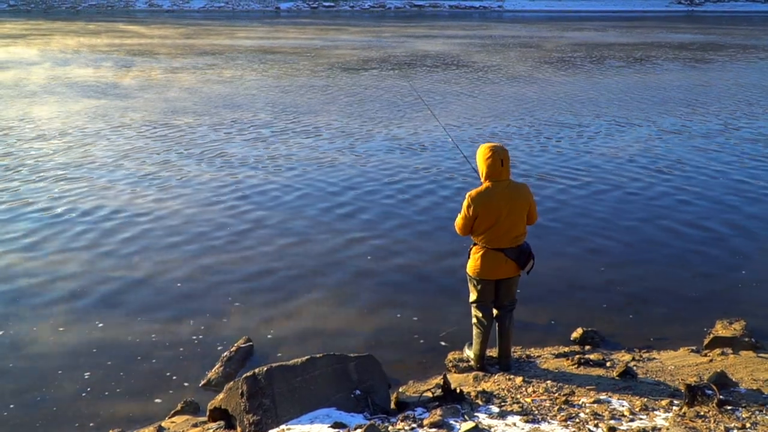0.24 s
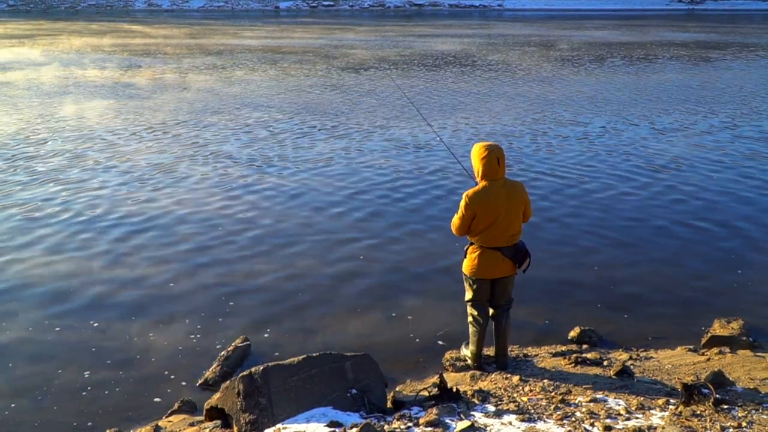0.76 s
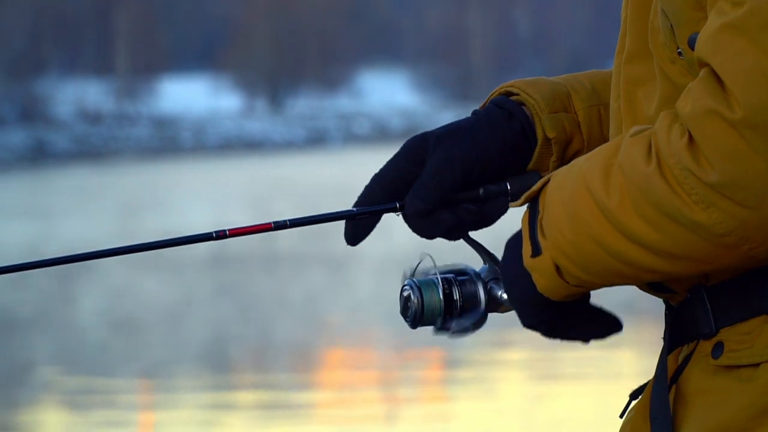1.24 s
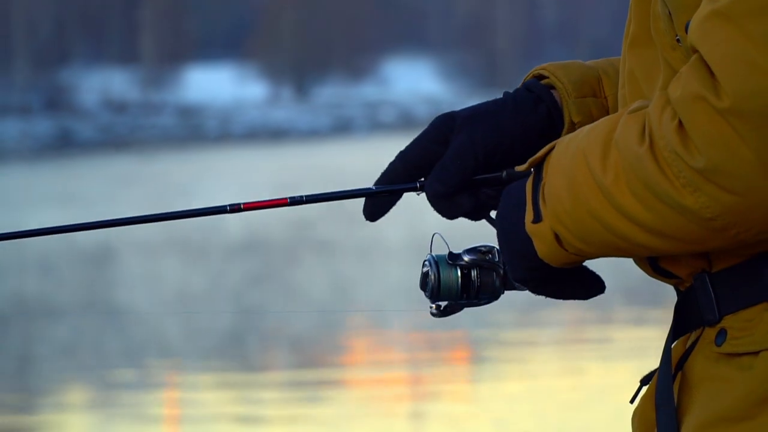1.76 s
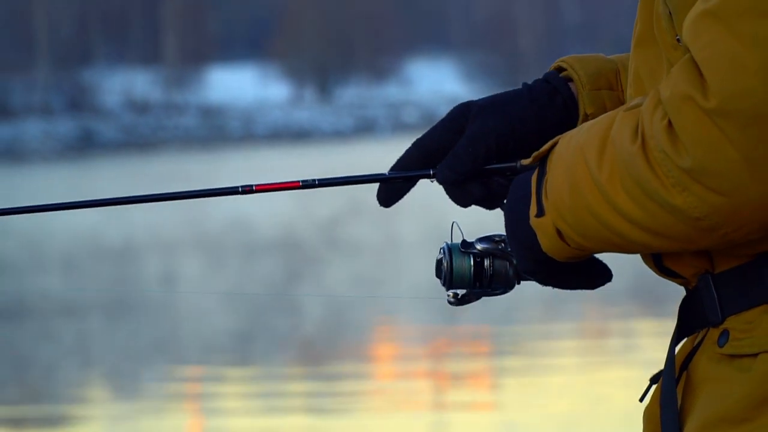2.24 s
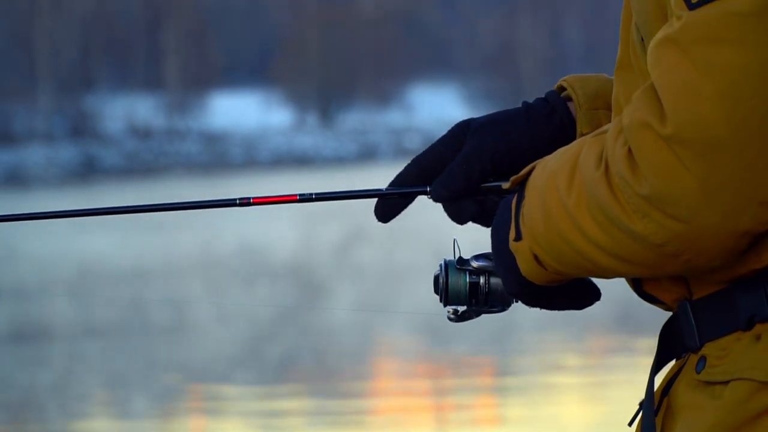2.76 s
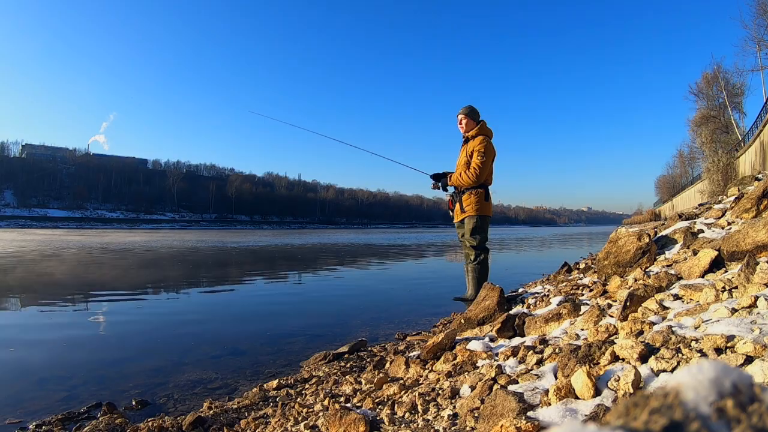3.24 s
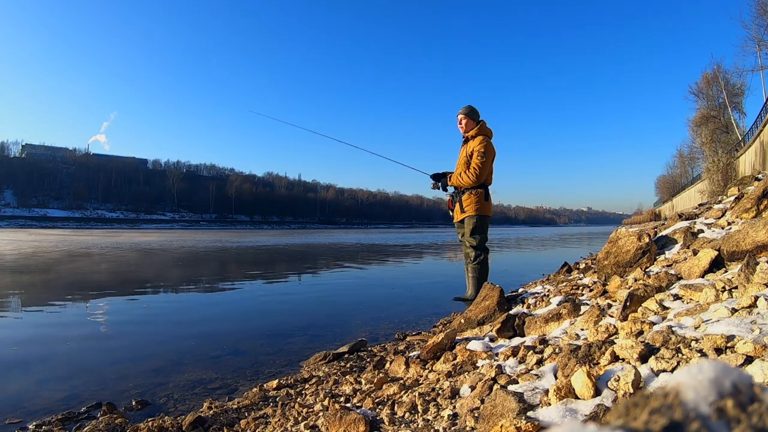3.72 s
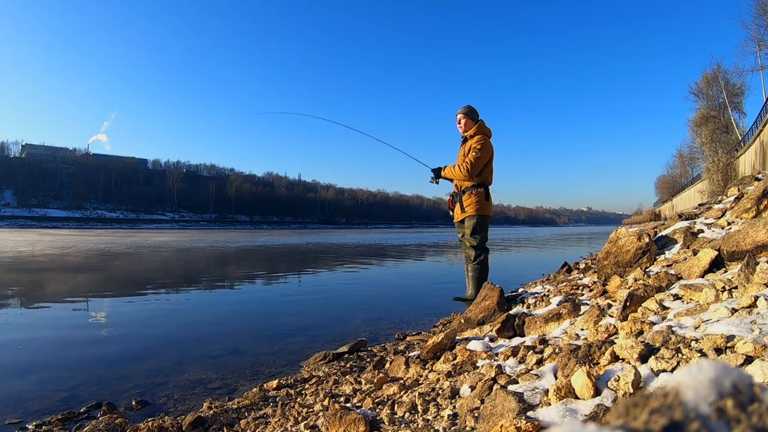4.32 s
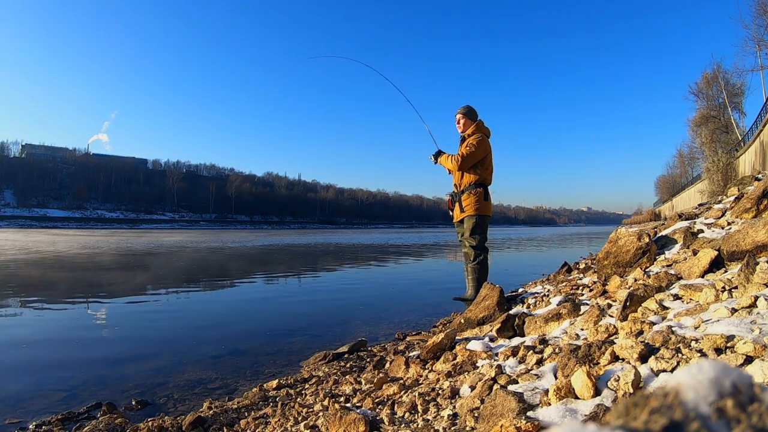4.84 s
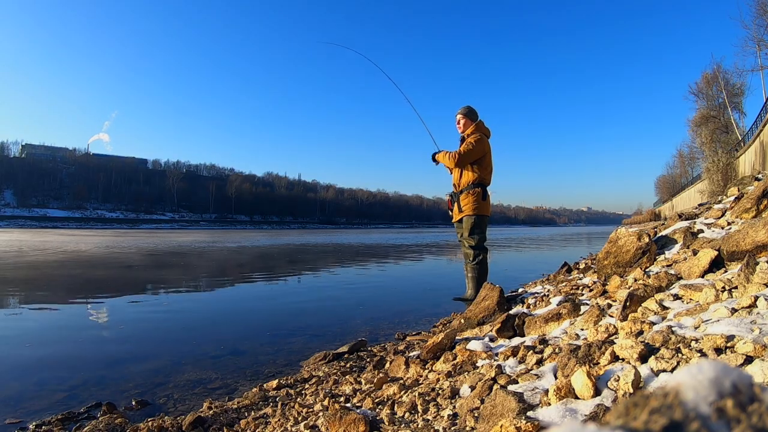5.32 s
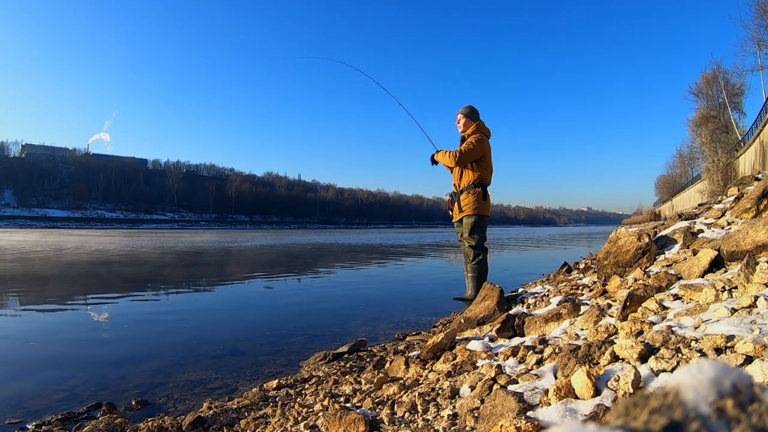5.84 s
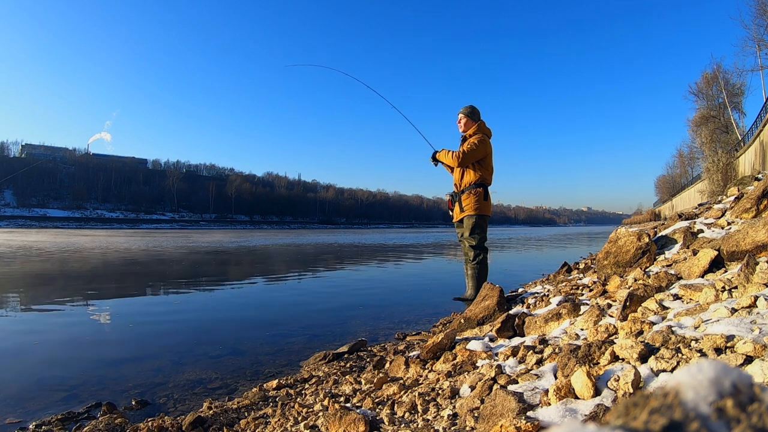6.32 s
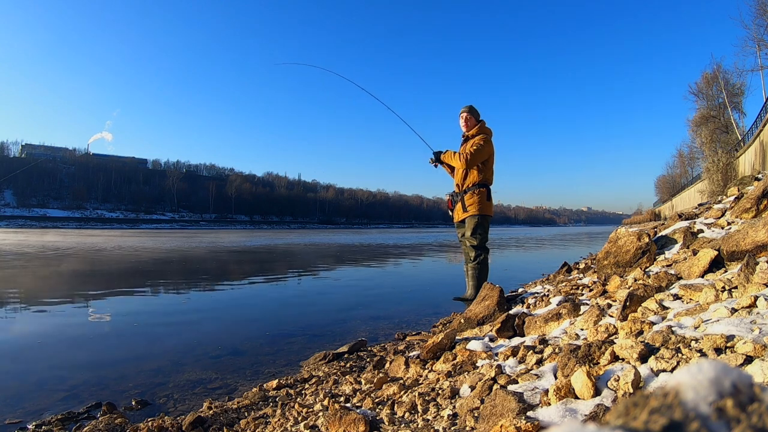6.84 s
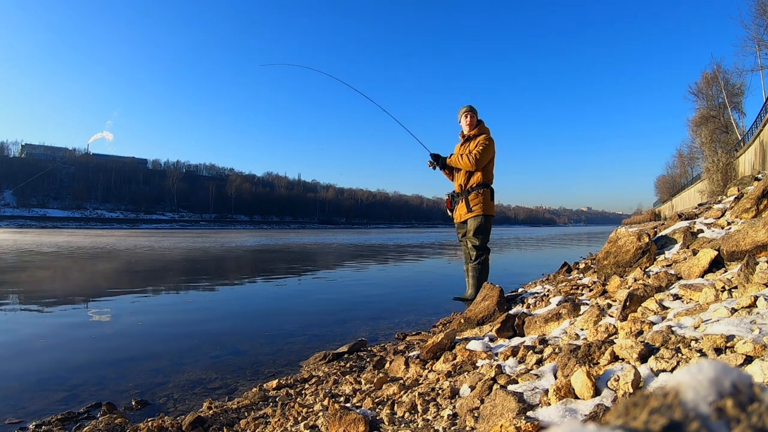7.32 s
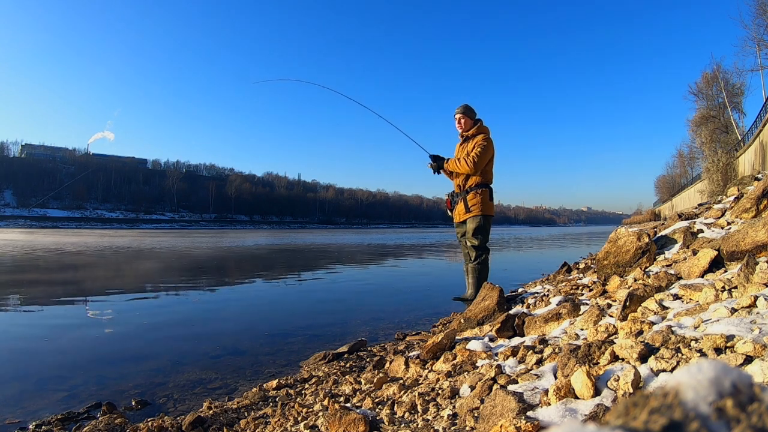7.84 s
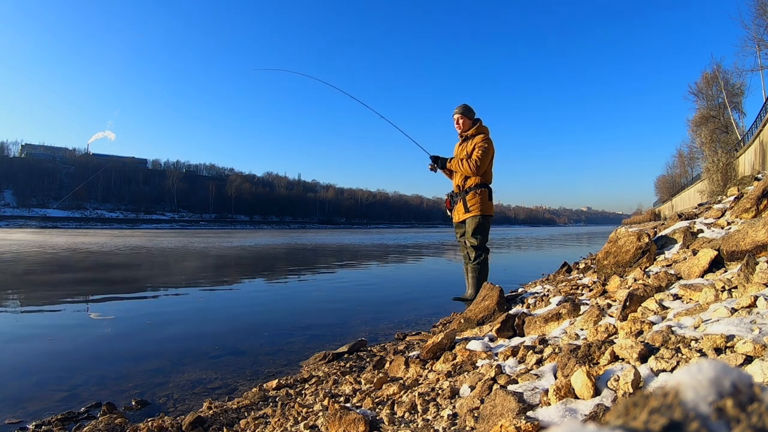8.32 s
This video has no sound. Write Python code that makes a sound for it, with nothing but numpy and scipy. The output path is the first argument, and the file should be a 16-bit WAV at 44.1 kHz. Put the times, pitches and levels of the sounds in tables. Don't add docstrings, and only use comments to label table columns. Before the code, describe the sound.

A continuous low rumble of distant city traffic spreads across a wide, open river bank, blended with soft tyre roar and a very faint hiss that slowly thins. From 0 to 0.6 s a weak brake scrape fades on the left, while a steady-pitched gearbox hum surges at 0.2, 1.3, 2 and 3 s, ending near 3.8 s. A heavy engine throbs in short deep pulses, with tiny bright brake chirps around 2.1 and 3.5 s. From 3.8 to 5.8 s the throbs become strongest and slightly higher, then weaken. A second deep engine gradually speeds up, swelling from 5.4 s to a peak at 6.8 s, then easing away. A low, dull brake scrape sounds at 6.7 s; faint high squeals follow to about 8 s. Small rumble swells close the 8.6 s. The stereo microphone is distant, with bass shared and treble wide.

```python
import sys
import numpy as np
from scipy import signal
from scipy.fft import rfft, irfft, next_fast_len
from scipy.io import wavfile
from scipy.ndimage import uniform_filter1d, map_coordinates

SR = 44100
rng = np.random.default_rng(int(sys.argv[2]) if len(sys.argv) > 2 else 0)


def wav_record(signal):
    frames = np.transpose(np.atleast_2d(signal))
    bounded = np.clip(frames, -1, 1)
    quanta = np.round(bounded * 32767).astype(np.int16)
    wavfile.write(sys.argv[1], SR, quanta)


def volts_from_db(level):
    exponent = np.asarray(level, float) / 20
    return 10 ** exponent


N = 378378
TIME_S = np.arange(N) / SR


def unit(x):
    return x / np.sqrt(np.mean(x ** 2) + 1e-20)


def along(points, hz):
    point_hz, value = np.transpose(points)
    return np.interp(np.log(hz + 1), np.log(point_hz + 1), value)


def wobble(knots_per_s):
    knots = rng.standard_normal(int(N * knots_per_s / SR) + 4)
    return map_coordinates(knots, [np.arange(N) * knots_per_s / SR])


def filtered(x, response):
    size = next_fast_len(N + 8192)
    return irfft(rfft(x, size) * response(np.fft.rfftfreq(size, 1 / SR)), size)[..., :N]


def plateau(start_s, length_s, edge_s):
    outside_s = np.maximum(start_s - TIME_S, TIME_S - start_s - length_s)
    return np.clip(1 - outside_s / edge_s, 0, 1)


def bursts(rows, rise_db_per_s, sag_db_per_s, fall_db_per_s):
    levels_db = []
    for start_s, hold_s, level_db in rows:
        since_s = TIME_S - start_s
        rise_db = rise_db_per_s * np.clip(-since_s, 0, None)
        sag_db = sag_db_per_s * np.clip(since_s, 0, hold_s)
        fall_db = fall_db_per_s * np.clip(since_s - hold_s, 0, None)
        levels_db.append(level_db - rise_db - sag_db - fall_db)
    return volts_from_db(np.max(levels_db, axis=0))


def tone(hz, wander_rad):
    return np.sqrt(2) * np.sin(2 * np.pi * np.cumsum(hz) / SR + wander_rad * wobble(6))


def narrow(hz, width_hz, shape):
    f = np.fft.rfftfreq(shape[1], 1 / SR)
    resonance = 1 + (2 * (f - hz) / width_hz) ** 2
    return unit(irfft(rfft(rng.standard_normal(shape)) / resonance, shape[1]))


# freq_hz, likeness [0-1]
ALIKE = [(30, 0.9), (70, 0.84), (110, 0.97), (350, 1), (480, 1), (620, 0.5), (700, 0), (850, 0.21),
         (2300, 0.03), (3200, 0)]


def rush(spectrum, patchy_db):
    z = signal.stft(rng.standard_normal((2, N + 512)), nperseg=512)[2]
    patches = uniform_filter1d(rng.standard_normal(z.shape[1:]), size=6, axis=0)
    patches = uniform_filter1d(patches, size=20, axis=1)
    pair = signal.istft(z * volts_from_db(patchy_db * unit(patches)), nperseg=512)[1][:, :N]

    def mid_side(hz):
        turn_rad = np.arccos(np.clip(along(ALIKE, hz), 0, 1)) / 2
        return volts_from_db(along(spectrum, hz)) * [np.cos(turn_rad), np.sin(turn_rad)]

    mid, side = filtered(pair, mid_side)
    return unit(np.array([mid + side, mid - side]))


# freq_hz, density_db [per Hz]
RUMBLE = [(8, -47), (20, -16), (30, -7.5), (42, -0.5), (86, 1.5), (140, -3.5), (217, -5), (290, -7.5),
          (345, -8), (400, -11), (500, -17.5), (650, -37), (1100, -120)]
ROAR = [(210, -39), (350, -5.5), (430, -16.5), (580, -11.5), (760, -17), (950, -20.5), (1450, -24.5),
        (1700, -26.5), (2100, -30.5), (2600, -34.5), (3400, -40.5), (5000, -53), (8000, -120)]
HISS = [(1200, -42), (2600, -12.5), (3400, -0.5), (4500, -1), (6000, -4), (8000, -9), (10000, -13.5),
        (12500, -21.5), (15300, -31), (16500, -120)]
# freq_hz, density_db
EXHAUST = [(15, -120), (38, -20.5), (60, 8), (85, 10.0), (120, -18.5), (300, -120)]
# start_s, length_s, rumble_swell_db, exhaust_swell_db
PASSES = [
    (0, 0.11, -1.5, 1),
    (3.85, 0.12, 2.3, -3.5),
    (6.35, .15, 0, 12.5),
    (7.001, .1, -0.5, 1),
    (7.58, .05, 3, 6.5),
    (7.94, .03, 2.5, 0.5),
    (8.265, .03, 0, 2),
    (8.5, 0.087, 2.2, -3),
]


def road():
    body_db, exhaust_db = sum(np.outer(row[2:], plateau(row[0], row[1], edge_s=0.08)) for row in PASSES)
    swell = wobble(1.6)
    rumble = volts_from_db(-26.5 + body_db + 0.67 * swell) * rush(RUMBLE, patchy_db=0.12)
    roar = volts_from_db(-37.5 + 0.39 * body_db + 0.24 * swell) * rush(ROAR, patchy_db=0.82)
    hiss_fade_db_per_s = 0.39
    hiss = volts_from_db(-62 - hiss_fade_db_per_s * TIME_S + 0.41 * swell) * rush(HISS, patchy_db=0.5)
    exhausts = volts_from_db(-40.5 + exhaust_db) * rush(EXHAUST, patchy_db=0.5)
    return rumble + exhausts + volts_from_db([[0.7], [-0.7]]) * (roar + hiss)


def brakes(rows, width_share, rise_s):
    t = np.arange(2 ** 16) / SR
    out = np.zeros((2, N + len(t)))
    flutter_db = 1.1 * wobble(14)
    for start_s, length_s, pitch_hz, level_db, pan_db in rows:
        rise = np.clip(t / rise_s, 0, 1)
        fade_db = -60 * np.clip(t - length_s, 0, None) / (0.46 + 3.6 * length_s)
        sides_db = np.array([[pan_db], [-pan_db]]) / 2
        ring = narrow(pitch_hz, width_share * pitch_hz, shape=(2, len(t)))
        start = round(start_s * SR)
        out[:, start:start + len(t)] += rise * volts_from_db(level_db + fade_db + sides_db) * ring
    return volts_from_db(flutter_db) * out[:, :N]


# start_s, length_s, pitch_hz, level_db, left_minus_right_db
SCRAPES = [
    (0.0, 0.57, 1770, -59.5, 6.5),
    (2.4, 0.091, 1710, -57, 4.5),
    (5.1, .33, 10800, -85, -11),
    (6.7, 0.54, 1210, -45.5, -1),
    (7.29, 0.89, 10600, -78.5, -7),
]


def brake_scrapes():
    return brakes(SCRAPES, width_share=0.11, rise_s=0.12)


# start_s, hold_s, level_db
SURGES = [
    (.2, .42, -30),
    (1.05, .15, -34),
    (1.27, 0.34, -29.5),
    (2.02, 0.064, -31.5),
    (2.3, 0.022, -32.5),
    (2.76, .08, -31.5),
    (2.96, 0.048, -30),
    (3.7, 0.12, -31),
]


def gearbox():
    mesh = 0.72 * tone(np.full(N, 318.4), wander_rad=0.9) + 0.68 * narrow(321, 30, shape=(1, N))
    load = bursts(SURGES, rise_db_per_s=58.5, sag_db_per_s=0, fall_db_per_s=81.5)
    recede_db_per_s = 1.2
    coast = volts_from_db(-35 - recede_db_per_s * TIME_S)
    return np.maximum(load, coast) * unit(mesh) * volts_from_db([[0.3], [-0.3]])


# start_s, hold_s, level_db
THROBS = [(.24, 0.16, -29.5), (1.0, 0.39, -29), (1.84, 0.018, -35), (2.03, .25, -26), (2.68, 0.016, -27),
          (2.88, .08, -27.5), (3.05, 0.25, -28), (3.78, 0.16, -20), (4.16, 0.053, -21), (4.36, 0.025, -21),
          (4.58, .21, -20.5), (4.98, 0.082, -22.5), (5.19, .19, -20.5), (5.54, 0.28, -21),
          (6.5, 0.13, -24.5), (7.05, 0.26, -26), (7.96, 0.14, -27)]


def heavy_engine():
    idle_hz, loaded_hz = 64.7, 66.65
    load_from_s, load_to_s = 3.75, 5.9
    load = plateau(load_from_s, load_to_s - load_from_s, edge_s=0.24)
    firing_hz = idle_hz + (loaded_hz - idle_hz) * load
    throb = bursts(THROBS, rise_db_per_s=169, sag_db_per_s=15.5, fall_db_per_s=139)
    return volts_from_db(-1.5) * throb * tone(firing_hz, wander_rad=0.35)


# time_s, pitch_hz, level_db
PULLER = [
    (0, 61.2, -59),
    (1.8, 63.3, -47),
    (4.3, 69.4, -51.5),
    (5.4, 72, -37),
    (6.1, 73.3, -29.5),
    (6.8, 74, -28),
    (7.05, 73.2, -38),
    (8.58, 76.3, -54),
]


def pulling_engine():
    time_s, pitch_hz, level_db = np.transpose(PULLER)
    firing_hz = np.interp(TIME_S, time_s, pitch_hz)
    gain_db = np.interp(TIME_S, time_s, level_db) + 0.6 * wobble(5)
    return volts_from_db(gain_db) * tone(firing_hz, wander_rad=0.2) * [[1], [-1]]


# start_s, length_s, pitch_hz, level_db, left_minus_right_db
SQUEALS = [
    (2.128, 0.105, 8680, -70.5, 14.5),
    (2.174, .05, 8900, -67, -4),
    (2.967, 0.091, 13400, -92, 7),
    (3.49, .1, 8520, -76, 8.5),
    (6.35, .15, 9360, -85.5, 1),
    (6.052, 0.11, 15250, -94.5, -5),
    (7.66, .06, 15140, -95.5, -1),
    (7.9, 0.16, 15200, -92, 9),
]


def brake_squeals():
    return brakes(SQUEALS, width_share=0.025, rise_s=0.025)


# freq_hz, lead_rad [left port ahead]
LEAD = [(0, -0.5), (340, 0.3539), (600, 1.2), (1980, 13.5), (2840, 16)]


def ports(pair):
    return filtered(pair, lambda hz: np.exp(0.5j * along(LEAD, hz) * np.array([[1], [-1]])))


def scene():
    across_river = ports(road() + gearbox())
    return across_river + brake_scrapes() + heavy_engine() + pulling_engine() + brake_squeals()


def band_limit(x):
    return signal.sosfilt(signal.butter(12, 15350, fs=SR, output="sos"), x)


def record(dry):
    mix = dry - [[0.0037], [0.0045]]
    return band_limit(mix)


dry = scene()
out = record(dry)
wav_record(out)
```